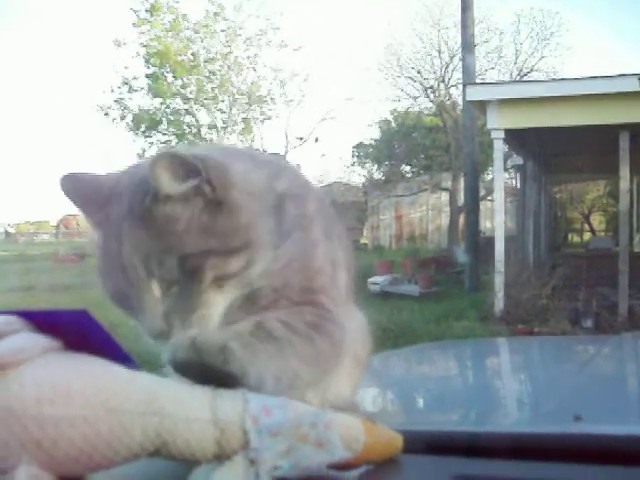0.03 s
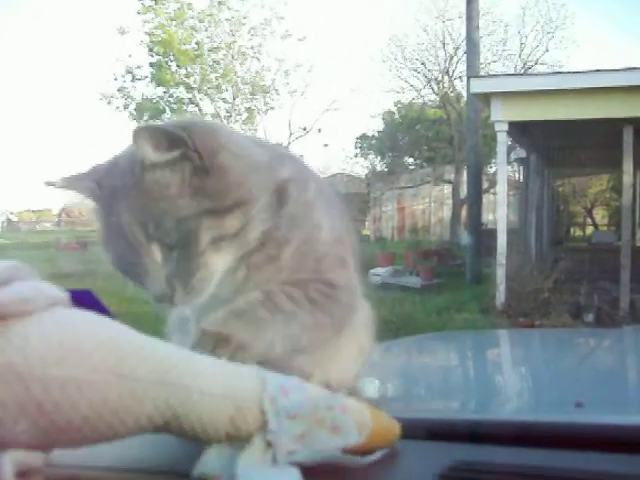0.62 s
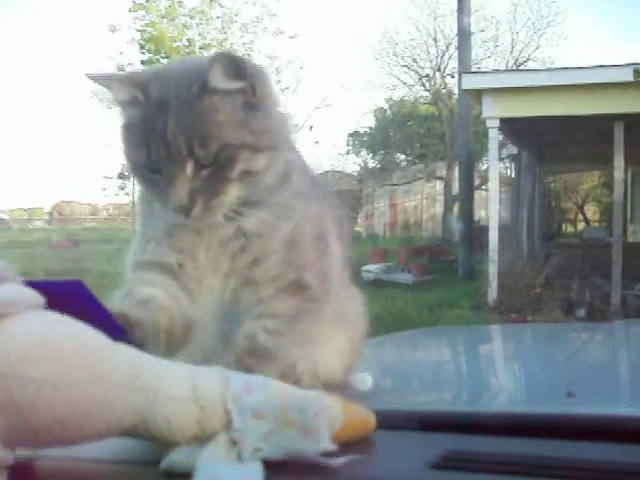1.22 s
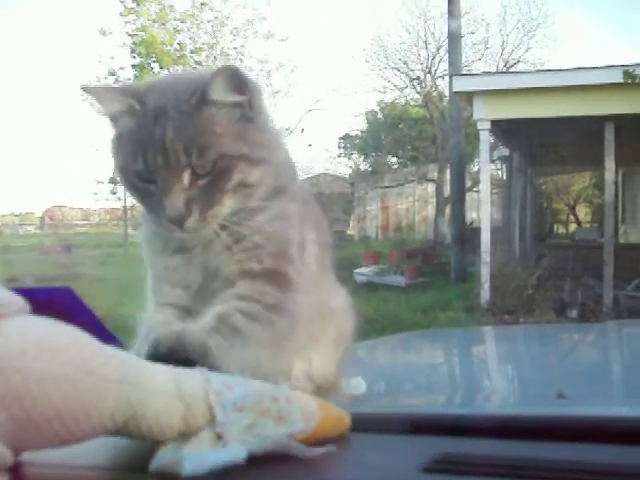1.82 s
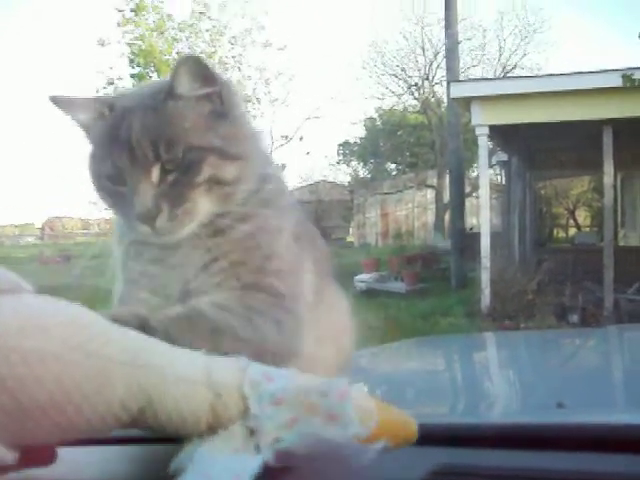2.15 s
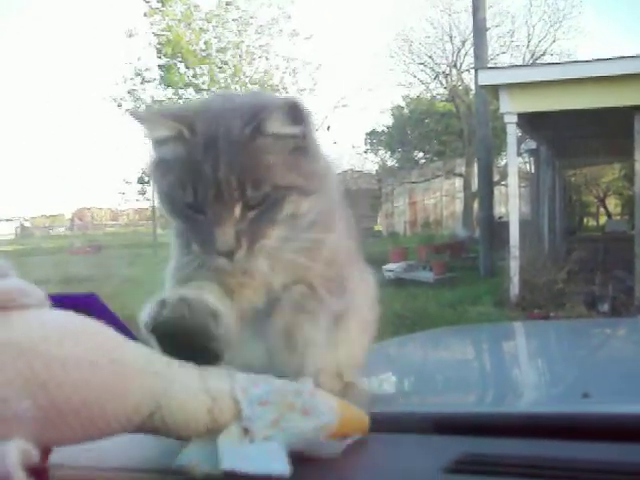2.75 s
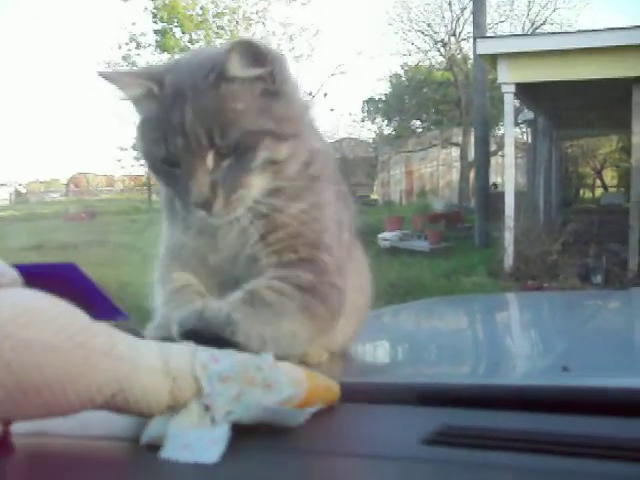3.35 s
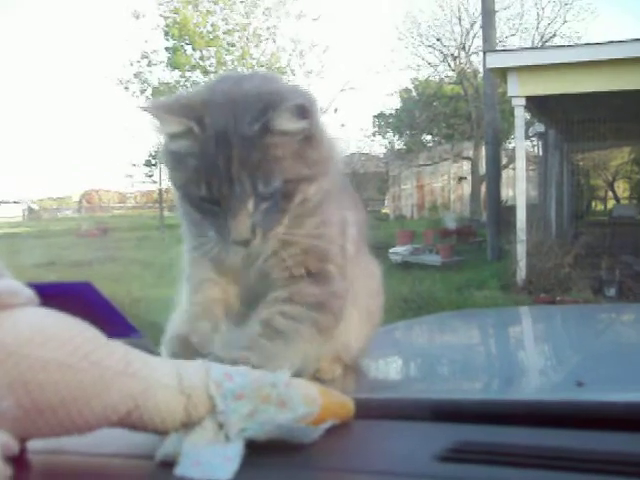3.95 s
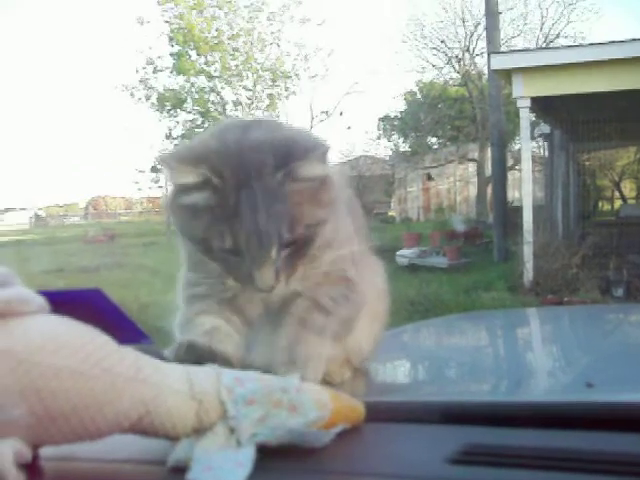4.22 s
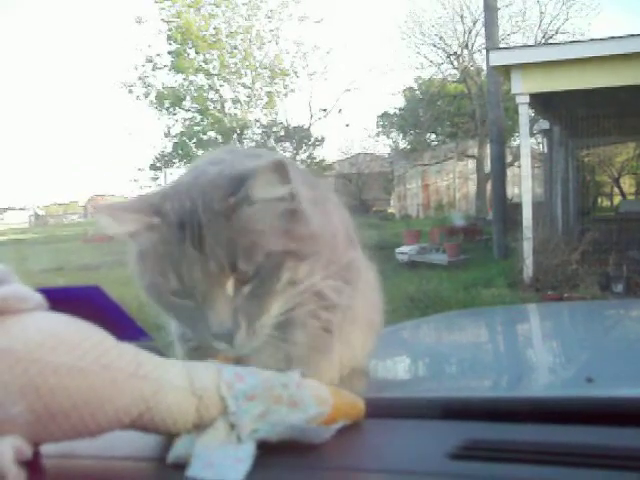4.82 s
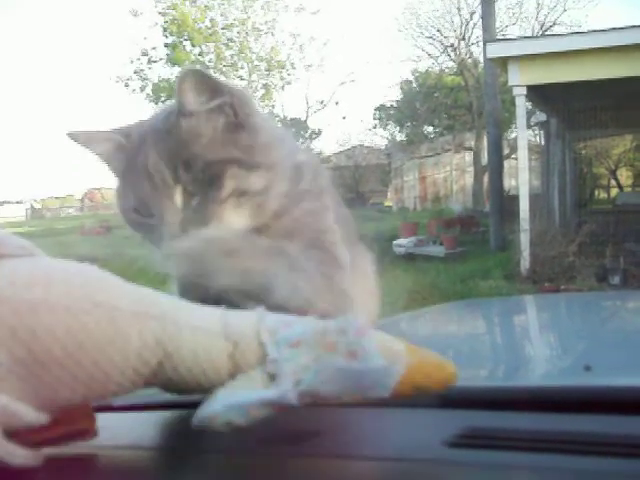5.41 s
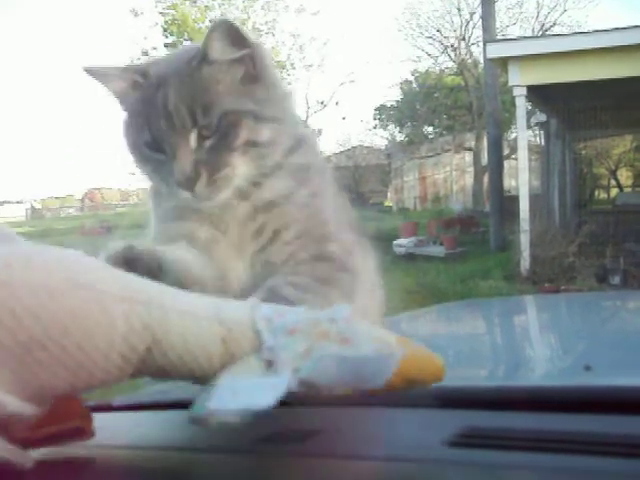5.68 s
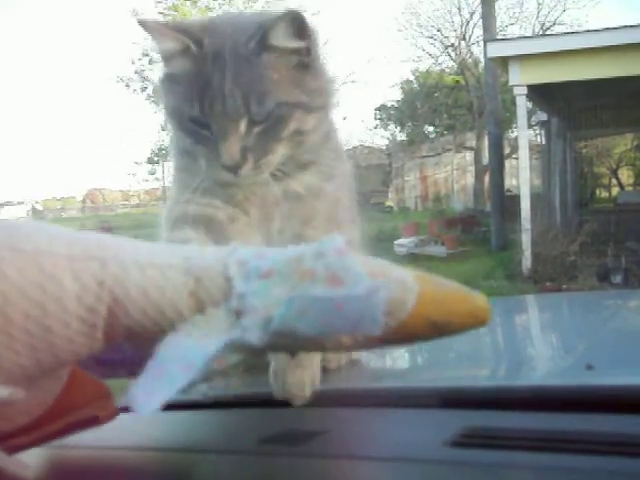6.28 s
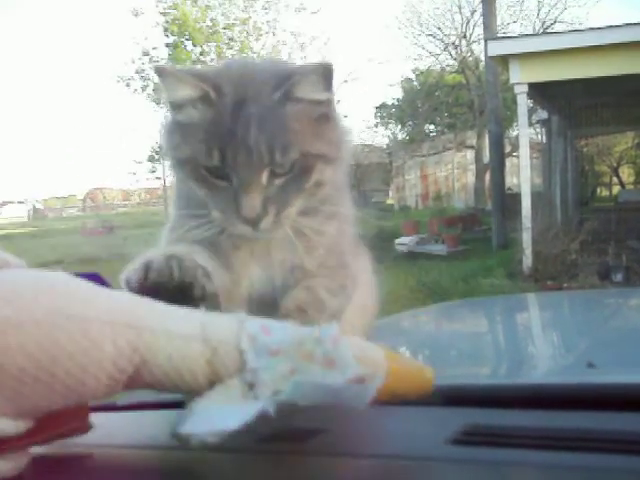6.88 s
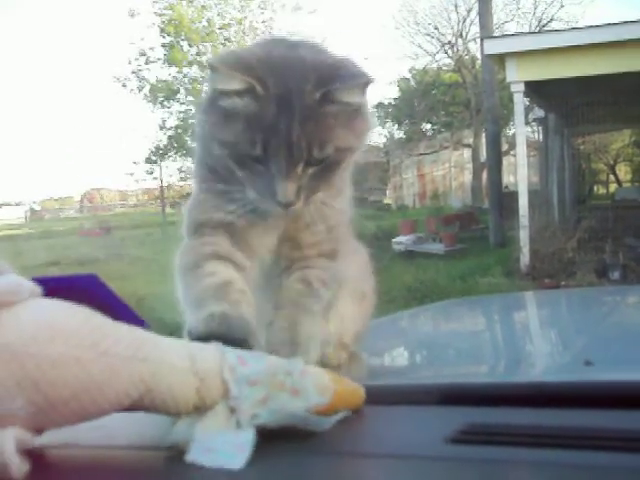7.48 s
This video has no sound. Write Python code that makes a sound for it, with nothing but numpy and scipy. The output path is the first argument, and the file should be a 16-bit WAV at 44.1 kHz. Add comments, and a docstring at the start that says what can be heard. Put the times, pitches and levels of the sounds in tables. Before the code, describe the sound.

Irregular dull thumps, claw clicks and brief scrapes of a cat batting at a windshield, inside a parked car with steady hiss.

```python
"""Cat batting at a windshield

Inside a parked car, one narrow-band microphone above the dashboard, close to the glass.
Each paw thumps the pane and the cabin booms; claws tick, scratch and squeak, and soft pads rub.
Under it lie the cat's shuffling, a low hum, a faint trill far outside, an even hiss and a rumble."""
import sys
import numpy as np
from scipy import signal
from scipy.fft import rfft, irfft
from scipy.io import wavfile

SR = 44100
rng = np.random.default_rng(int(sys.argv[2]) if len(sys.argv) > 2 else 0)


def wav_record(signal):
    """Record a signal, one row per channel, as 16-bit PCM in the file named by sys.argv[1]."""
    frames = np.transpose(np.atleast_2d(signal))
    bounded = np.clip(frames, -1, 1)
    # unit amplitude maps onto the largest positive 16-bit level
    quanta = np.round(bounded * 32767).astype(np.int16)
    wavfile.write(sys.argv[1], SR, quanta)


N = 332955

# modes of windshield and cabin: (frequency [Hz], level [dB], t60 [s])
GLASS_MODES = [(61.5, -18, 0.129), (94.6, -12.5, 0.35), (144.3, -1.5, 0.2), (176.3, -9.5, 0.19),
               (215.4, -7, 0.18), (238, -52, 0.028), (324.7, -21, 0.1), (394.5, -9, 0.073),
               (461.8, -3, 0.068), (524, -17.5, 0.083), (660, -38.5, 0.047), (743, -3.5, 0.042),
               (943, -5, 0.061)]
# bats with the claws out: (time [s], force [dB], contact time [ms], low-mode boost [dB],
# middle-mode boost [dB], tick level [dB], claw ring [Hz])
BATS = [(0.3514, -26, 0.11, 8, -1.5, -39, 2300), (0.6533, -23.5, .09, -9, -1, -52, 2660),
        (.778, -11.5, 0.85, 1, 5, -36, 3000), (0.7901, -26, 0.14, -1, 2, -39.5, 2310),
        (.843, -22, 0.3, 3, 3.5, -48, 2700), (1.292, -13.5, 0.64, -11, -6.5, -33.5, 3630),
        (1.504, -25, 0.33, -11.5, 3.5, -45, 4530), (1.8578, -25.5, 0.29, 22, 2, -51, 2000),
        (2.098, -6.5, 0.75, 2.5, 4, -35.5, 2900), (2.1176, -25, .12, 7, 5.5, -41, 2830),
        (2.381, -8, 0.47, -2, 4, -26.5, 2930), (2.478, -25, 0.4, 11, 6.5, -34.5, 2370),
        (2.529, -29, 0.19, 0, 1, -41, 2380), (2.771, -9.5, 0.49, 3, 8.5, -19, 4110),
        (2.8791, -17, 0.7, 5, 6, -39, 2640), (3.1422, -8.5, 0.64, -3, 5.5, -25, 3200),
        (3.3384, -12, 0.88, -9, 7.5, -36, 4300), (3.562, -15, 0.69, 4.5, 6, -37, 3360),
        (4.003, -21.5, 0.61, -9, -6, -31, 5170), (4.071, -15.5, 0.58, -3, 1, -29.5, 4600),
        (4.339, -7.5, 0.85, -9, 0.5, -40.5, 4570), (4.6398, -13.5, 1.14, -5, 0.5, -34.5, 4400),
        (5.4916, -3.5, 1.65, 1.5, 6, -30.5, 2940), (5.5, -12, 0.36, 4.5, 3.5, -27.5, 2210),
        (5.9616, -16, 0.54, 2, -1, -41, 2300), (6.201, -17.5, 0.62, -3.5, -1, -32.5, 2300),
        (6.4693, -21, 0.63, -11, 2.5, -42.5, 4230), (6.757, -3.5, .57, -1.5, -0.5, -27, 2970),
        (7.0341, -4, 0.7, -7, -5, -30.5, 2220), (7.341, -9.5, 0.78, -21, 5, -27.5, 3920)]
# bumps of the pad alone: (time [s], force [dB], contact time [ms], low-mode boost [dB])
BUMPS = [(.644, -27, 0.47, 25.5), (.8512, -9.5, 1.8, 10), (0.9779, -26, 0.61, 17), (1.635, -20, 1.6, -10),
         (1.6879, -18, 1.6, 4), (1.8813, -13, 1.12, -8), (2.2924, -22, 1.1, 22), (2.7877, -5, 3.6, 18),
         (2.9396, -18.5, 0.69, -11), (3.0195, -21, 1.2, 14.5), (3.155, -9.5, 1.06, 0),
         (3.8048, -20, 0.76, -3), (4.9684, -10.5, 0.96, -8.5), (5.3037, -15.5, 1.83, 12.5),
         (7.0551, -9, 0.68, -11)]
# claw tips grazing the pane: (time [s], tick level [dB], claw ring [Hz])
GRAZES = [(.825, -47.5, 3070), (1.257, -43, 4700), (2.1625, -41, 2540), (2.1816, -38.5, 4900),
          (2.556, -42, 2550), (2.78, -39, 2520), (3.4244, -42, 4660), (3.5058, -43.5, 4780),
          (3.6142, -42, 4750), (4.169, -47, 2760), (4.353, -37.5, 4470), (5.589, -34, 2980),
          (5.8052, -44, 2620), (5.921, -42, 2510), (6.1384, -44, 2920), (7.1766, -41, 4860)]
# claws sliding: (peak time [s], length [s], level [dB], claw ring [Hz])
SCRATCHES = [(1.506, 0.036, -41.5, 4520), (2.205, 0.12, -36.5, 5140), (2.319, .095, -50, 4670),
             (2.485, .06, -37.5, 2950), (2.908, .08, -32.5, 2930), (3.025, .1, -47.5, 4800),
             (3.173, .032, -36, 2800), (3.318, .24, -44.5, 3780), (5.59, 0.066, -31.5, 2900),
             (5.644, .1, -41.5, 2250), (7.041, 0.078, -43.5, 2080)]
# claws catching: (time [s], level [dB], pitch [Hz], rise [s], fall [s])
SQUEAKS = [(2.919, -35, 2990, 0.01, 0.006), (3.174, -26.5, 2784, 0.0018, 0.0034),
           (5.593, -31, 2730, 0.0035, 0.0072), (7.023, -34.5, 2056, 0.0042, 0.0053)]
# pads rubbing: (peak time [s], length [s], level [dB])
RUBS = [(0.342, .08, -36), (.648, 0.14, -35.5), (0.829, 0.14, -39), (1.08, .13, -38.5), (1.645, 0.13, -39),
        (1.861, .075, -29.5), (2.0, 0.053, -38), (2.113, 0.038, -23.5), (2.211, 0.059, -33),
        (2.307, 0.073, -32), (2.497, 0.041, -32.5), (2.545, .06, -35.5), (2.779, 0.037, -25.5),
        (2.91, .11, -35.5), (3.332, .19, -38), (4.828, 0.045, -42), (4.98, 0.029, -36),
        (5.293, 0.12, -40.5), (5.616, 0.14, -37), (7.008, .11, -35)]
# the cat's body shifting: (time [s], level [dB])
SHUFFLE_LEVELS = [(0.0, -40.5), (0.92, -39.5), (1.26, -43), (2.1, -44), (2.33, -35.5), (2.56, -39.5),
                  (2.8, -45), (2.94, -37.5), (3.81, -48), (5.34, -53.5), (5.55, -33.5), (6.27, -52),
                  (6.77, -47), (6.94, -38.5), (7.21, -39), (7.55, -49)]
# low tones: (start [s], pitch [Hz], glide [Hz/s], level [dB], fade [dB/s])
HUMS = [(-.4, 78.26, 1, -35.5, 4), (.55, 59.5, -3, -38, 6.5), (1.7, 63, 0.5, -52, 0)]
# far trills: (start [s])
TRILL_STARTS = [.46, .84, 1.62, 4.08, 5.241, 6.29, 7.22]
# spectrum of each noise: (frequency [Hz], relative level [dB])
TICK_SPECTRUM = [(1200, -26.5), (2000, -1), (2900, 2.5), (3400, 1), (4100, -5), (4800, 1.5), (5500, -1),
                 (7000, -11.5)]
KNOCK_SPECTRUM = [(250, -14.5), (500, 5.5), (800, 0.5), (1200, -4.5), (1700, -3), (2100, -7.5), (3000, -32)]
SCRATCH_SPECTRUM = [(500, -15), (1500, -7.5), (2300, 0), (3200, -2), (4000, -7), (5000, -5.5),
                    (7000, -18.5)]
RUB_SPECTRUM = [(60, -6), (150, 9.5), (300, -5.5), (480, 3), (900, -7.5), (1600, -18.5), (3500, -23.5)]
SHUFFLE_SPECTRUM = [(40, -16.5), (70, 3.5), (95, 0), (120, 2.5), (150, 3), (210, 0.5), (300, -14.5),
                    (450, -11.5), (1000, -32.5)]
HISS_SPECTRUM = [(100, -21), (250, 5), (450, 5.5), (700, 3.5), (1100, 1.5), (2000, -0.5), (3500, -2.5),
                 (5000, -6), (7000, -16)]
RUMBLE_SPECTRUM = [(4, 6.5), (15, 5.5), (30, 4), (55, -2), (90, -11), (160, -12), (220, -18), (320, -26.5),
                   (700, -58)]


def paws(uneven_db=1.3):
    """Each pad presses a short pulse into the glass; a softer contact leaves the higher modes quiet."""
    t = np.arange(SR // 2) / SR
    hz, db, t60 = np.transpose(GLASS_MODES)
    modes = amp(db[:, None] - 60 * t / t60[:, None]) * np.cos(2 * np.pi * hz[:, None] * t)
    low = 1 / (1 + (hz / 110) ** 6)
    middle = (hz > 280) & (hz < 600)
    thumps = [bat[:5] for bat in BATS] + [(*bump, 0) for bump in BUMPS]
    out = np.zeros(N)
    for s, force_db, contact_ms, low_db, middle_db in thumps:
        age = t[:SR // 30] * 1000 / contact_ms
        push = age * np.exp(-age)
        # where the paw lands sets which modes it drives
        drive = amp(low_db * low + middle_db * middle + uneven_db * rng.standard_normal(len(hz)))
        add(out, s, amp(force_db) * signal.fftconvolve(drive @ modes, push / push.sum()))
    return signal.lfilter(*signal.butter(1, 50, "high", fs=SR), out)


def claw_contacts():
    """Yields (time [s], tick [dB], ring [Hz], knock [dB]); a bat's knock grows with tick and push."""
    for s, force_db, contact_ms, _, _, tick_db, ring_hz in BATS:
        push_db = force_db - 20 * np.log10(contact_ms)
        yield s, tick_db, ring_hz, -15 + 0.53 * tick_db + 0.36 * push_db
    for s, tick_db, ring_hz in GRAZES:
        yield s, tick_db, ring_hz, tick_db - 11


def claws(snap=4, rise_s=0.00033, clean_tick_db=-17.5, chatter_ms_per_db=0.16, max_chatter_ms=3.3):
    """A claw snaps onto the pane and chatters for a moment: a bright tick over a duller knock."""
    lead, head = SR // 1000, SR // 110  # samples before the hit; samples that set its level
    t = np.maximum(np.arange(SR // 16) - lead, 0) / SR
    attack = 1 - np.exp(-t / rise_s)
    out = np.zeros(N)
    for s, tick_db, ring_hz, knock_db in claw_contacts():
        # the harder a claw strikes, the less it chatters and the more it knocks
        chatter_ms = np.clip(chatter_ms_per_db * (clean_tick_db - tick_db), 0.29, max_chatter_ms)
        knock_db += 7.5 * (1 - chatter_ms / max_chatter_ms) ** 2
        age = 1000 * t / chatter_ms
        contact = rng.standard_normal(len(t)) * attack * np.exp(-age)
        contact[lead] -= snap  # with little chatter, this first snap is one dry crack
        tick = colour(contact, TICK_SPECTRUM)
        tick = unit(tick) + amp(-7) * unit(ring(tick, ring_hz, width_hz=900))
        knock = noise(KNOCK_SPECTRUM, len(t)) * attack * np.exp(-age / 1.6)
        strike = amp(tick_db) * tick / tick[:head].std() + amp(knock_db) * knock / knock[:head].std()
        add(out, s - lead / SR, strike)
    return out


def scratches(clump_db=2.5, ring_db=-3):
    """Sliding claws jerk over the glass and ring; the jerks crowd together in gritty clumps."""
    out = np.zeros(N)
    for peak, length, db, ring_hz in SCRATCHES:
        start, pressure = stroke(peak, length)
        clumps = amp(clump_db * wander(150, len(pressure)))
        grit = colour(clumps * slips(len(pressure), per_s=3500), SCRATCH_SPECTRUM)
        ringing = unit(ring(grit, ring_hz, width_hz=600))
        add(out, start, amp(db) * pressure * unit(unit(grit) + amp(ring_db) * ringing))
    return out


def squeaks(jitter=0.021):
    """A claw catches: for a few milliseconds its slips fall into step and it sings."""
    out = np.zeros(N)
    t = np.arange(SR // 8) / SR - .04
    for s, db, hz, rise_s, fall_s in SQUEAKS:
        pitch = hz * (1 + jitter * wander(400, len(t)))
        grip = np.exp(-(np.minimum(t, 0) / rise_s) ** 2 - np.maximum(t, 0) / fall_s)
        add(out, s + t[0], amp(db) * grip * tone(pitch))
    return out


def rubs():
    """Soft pads drag over the pane with a dull judder."""
    out = np.zeros(N)
    for peak, length, db in RUBS:
        start, pressure = stroke(peak, length)
        judder = colour(slips(len(pressure), per_s=2500), RUB_SPECTRUM)
        add(out, start, amp(db) * pressure * unit(judder))
    return out


def shuffling():
    """The cat shifts its weight: low, soft noise that swells and sinks."""
    level_db = np.interp(np.arange(N) / SR, *np.transpose(SHUFFLE_LEVELS))
    return amp(level_db) * noise(SHUFFLE_SPECTRUM, N)


def cabin(x, t60_s=0.11, wet_db=-13):
    """Adds close reflections from the dashboard and side windows, soon soaked up by the seats."""
    t = np.arange(SR // 6) / SR
    signs = rng.choice([-1., 1.], len(t))
    arrivals = (rng.random(len(t)) < 4000 / SR) & (t > .002)
    echoes = signs * arrivals * amp(-60 * t / t60_s)
    return x + amp(wet_db) * signal.fftconvolve(x, echoes / np.linalg.norm(echoes))[:N]


def hum(rise_s=0.41, waver_db=3.0):
    """Low tones come in, glide and waver in level; the louder ones fade away."""
    out = np.zeros(N)
    for start, hz, glide, db, fade in HUMS:
        age = np.maximum(np.arange(N) / SR - start, 0)
        level_db = db - fade * age + waver_db * wander(1, N)
        out += tone(hz + glide * age) * np.minimum(age / rise_s, 1) * amp(level_db)
    return out


def trills(hz=1970, width_hz=170, db=-58.5, length_s=.33):
    """A thin, blurred trill comes and goes far outside."""
    out = np.zeros(N)
    size = int(length_s * SR)
    for start in TRILL_STARTS:
        whistle = ring(ring(rng.standard_normal(size), hz, width_hz), hz, width_hz)
        add(out, start, amp(db) * unit(whistle) * signal.windows.tukey(size, .6))
    return out


def hiss(db=-48, flutter_db=.4):
    """An even hiss fills the cabin, its level barely fluttering."""
    return amp(db + flutter_db * wander(5, N)) * noise(HISS_SPECTRUM, N)


def rumble(db=-42, lumps_db=1.5, rock_db=-34.5, settle_s=0.11):
    """A lumpy low rumble swells whenever a bat rocks the car."""
    swell = amp(db + lumps_db * wander(4, N))
    settling = np.exp(-np.arange(SR) / SR / settle_s)
    for s, force_db, *_ in BATS:
        add(swell, s, amp(force_db + rock_db) * settling)
    return swell * noise(RUMBLE_SPECTRUM, N)


def stroke(peak, length, rise_share=.33):
    """Start time and pressure of a slide: it swells to a peak and eases off."""
    rise = length * rise_share
    return peak - rise, np.interp(np.arange(0, length, 1 / SR), [0, rise, length], [0, 1, 0])


def slips(size, per_s, spread_db=2.5):
    """Stick and slip: random tiny jerks of very uneven size."""
    jerk = rng.standard_normal(size) * amp(spread_db * np.minimum(rng.exponential(1, size), 4))
    return jerk * (rng.random(size) < per_s / SR)


def amp(db):
    """Decibels to gain."""
    return 10 ** (np.asarray(db) / 20)


def unit(x):
    """Scales to rms 1."""
    return x / np.sqrt(np.mean(x ** 2) + 1e-20)


def add(mix, s, sound):
    """Mixes a sound in at s seconds."""
    part = mix[max(round(s * SR), 0):][:len(sound)]
    part += sound[:len(part)]


def colour(x, spectrum):
    """Filters by a spectrum drawn on a log-frequency axis."""
    hz, db = np.transpose(spectrum)
    f = np.fft.rfftfreq(len(x), 1 / SR)
    return irfft(rfft(x) * amp(np.interp(np.log(f + 1), np.log(hz), db)), len(x))


def noise(spectrum, size):
    """Coloured noise of rms 1."""
    return unit(colour(rng.standard_normal(size), spectrum))


def tone(hz):
    """A sine of rms 1 that follows a pitch curve."""
    return np.sqrt(2) * np.sin(2 * np.pi * np.cumsum(hz) / SR)


def ring(x, hz, width_hz):
    """One resonance of gain 1."""
    return signal.lfilter(*signal.iirpeak(hz, hz / width_hz, SR), x)


def wander(rate_hz, size):
    """Smooth random drift of rms 1."""
    lowpass = np.exp(-(np.fft.rfftfreq(size, 1 / SR) / rate_hz) ** 2)
    return unit(irfft(rfft(rng.standard_normal(size)) * lowpass, size))


def scene():
    """Everything as it reaches one microphone above the dashboard."""
    cat = paws() + shuffling() + rubs() + cabin(claws() + scratches() + squeaks())
    return (cat + hum() + trills() + hiss() + rumble())[None]


def record(dry, band_hz=5600, ceiling=.74, edge_hz=17500):
    """A narrow-band microphone whose hardest peaks clip; a last low-pass trims the top."""
    microphone = signal.firwin(111, band_hz, window=("kaiser", 7), fs=SR)
    band_limit = signal.firwin(255, edge_hz, window=("kaiser", 9), fs=SR)
    narrow = signal.oaconvolve(dry, microphone[None], "same")
    clipped = np.clip(narrow, -ceiling, ceiling)
    return signal.oaconvolve(clipped, band_limit[None], "same")


dry = scene()
out = record(dry)
wav_record(out)
```